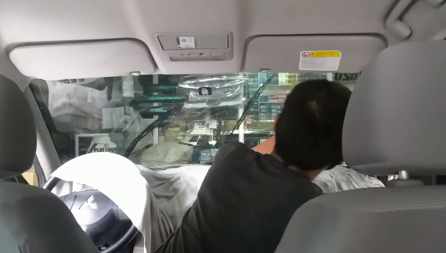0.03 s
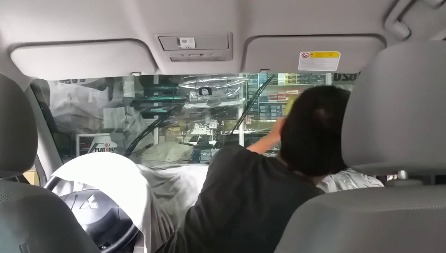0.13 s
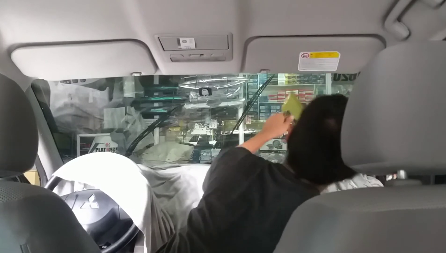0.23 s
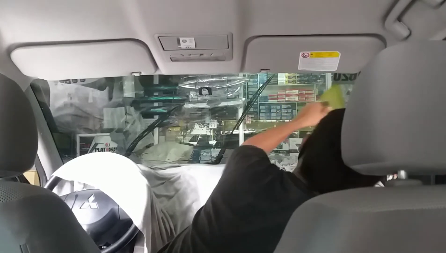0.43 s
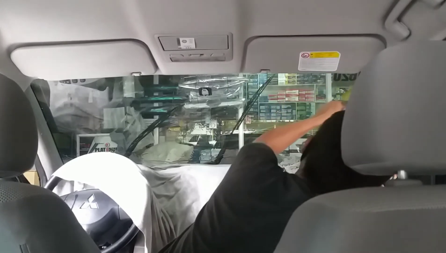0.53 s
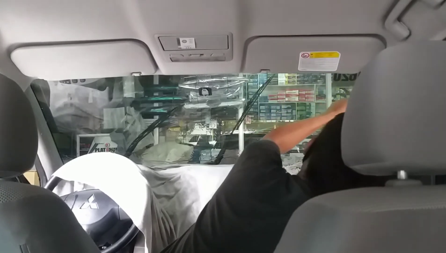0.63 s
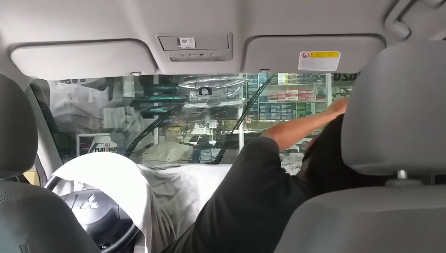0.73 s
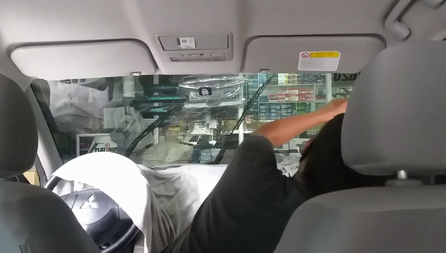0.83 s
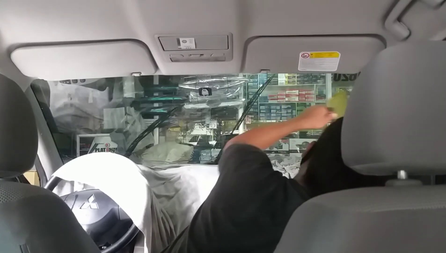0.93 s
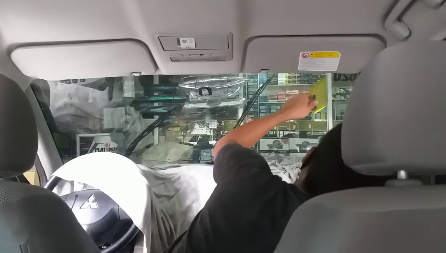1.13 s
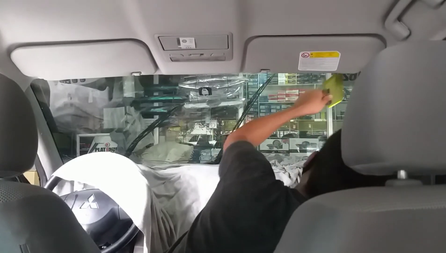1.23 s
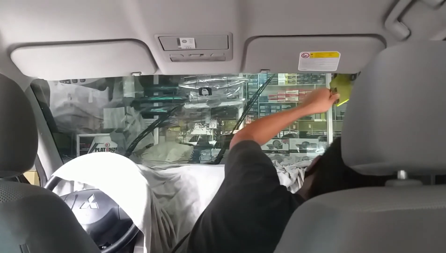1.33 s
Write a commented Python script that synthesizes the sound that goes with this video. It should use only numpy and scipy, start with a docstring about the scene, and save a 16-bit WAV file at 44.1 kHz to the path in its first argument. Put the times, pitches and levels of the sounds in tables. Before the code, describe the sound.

Plastic blade scraping and knocking on a windshield, heard inside the car over a faint motor.

```python
"""A plastic scraper is pushed across a car windshield, heard from the back seat.
From the start, a faint motor outside whines up in pitch over a low workshop hum, while tiny slips of
the blade hiss on the glass. A knock at 0.2 s makes the pane and the small cabin ring briefly.
Near 0.5 s the edge bites harder, squeaks and snaps free, and a lighter knock follows.
The hiss dies away, a last knock comes just after 1 s, and the motor and hum carry on."""
import sys
import numpy as np
from scipy import signal
from scipy.fft import rfft, irfft, next_fast_len
from scipy.io import wavfile
from scipy.ndimage import map_coordinates

SR = 44100
rng = np.random.default_rng(int(sys.argv[2]) if len(sys.argv) > 2 else 0)


def int16_out(signal):
    """Quantize to a 16-bit WAV file."""
    q = np.round(np.clip(np.atleast_2d(signal).T, -1, 1) * 32767)
    wavfile.write(sys.argv[1], SR, q.astype(np.int16))


N = 61739

# The three knocks: start_s, touch_db (relative to the thud), click_db, rebound_db (relative to the
# click), thud_db, ring_db, ring_tilt_db_per_octave, boom_db, click_cutoff_hz
KNOCKS = [(0.2136, -4, -22.5, -1, -27.5, -30.5, 0, -33.5, 10100),
          (0.6123, -44, -31.5, -4.5, -37.5, -59.5, 10.5, -62, 4520),
          (1.0576, -7.5, -26.5, 1, -39, -28, -3.5, -40.5, 12400)]
KNOCK_RISE_S = 0.00089


def scraper():
    """The blade hisses as it glides; where its edge bites, tiny slips make the plastic ring."""
    # How hard the blade presses as it glides: time_s, level_db
    pressure = [(0, -49.5), (.09, -49.5), (.15, -48.5), (.22, -47.5), (.33, -47.5), (.39, -50), (.5, -57),
                (.57, -54), (.61, -66.5), (.68, -67.5)]
    # Tone of the glide: pitch_hz, level_db
    glide_colour = [(60, 7.5), (140, 4), (220, 0.5), (550, 2), (850, -1), (1250, -20), (1700, -4.5),
                    (2800, -8.5), (3700, -2), (5000, -2.5), (7000, -7.5), (9000, -11), (11000, -25),
                    (15500, -45)]
    # How hard the edge bites: time_s, level_db
    bite_levels = [(.2, -60), (.3, -51.5), (.41, -54.5), (.465, -47), (.495, -40.5), (.52, -49),
                   (.553, -40.5), (.563, -38), (.574, -48), (.6, -80), (.63, -83)]
    # Where the blade likes to ring: pitch_hz, width_hz, level_db
    blade_modes = [(550, 26, -3), (993, 170, -4), (1406, 355, -4), (2050, 560, -6.5), (3277, 190, 1),
                   (3645, 50, 4), (4085, 210, 0.5), (4640, 550, -7), (5710, 370, -2), (6780, 390, -4.5),
                   (7780, 680, -12.5), (12800, 1900, -25)]
    # The finest hiss, loudest where the stroke is fast: time_s, level_db
    sizzle_levels = [(0, -77), (.13, -65.5), (.225, -49), (.3, -53.5), (.42, -65), (.56, -73), (.6, -67),
                     (.7, -100)]
    # Tone of that hiss: pitch_hz, level_db
    sizzle_colour = [(3000, -24), (7500, 8), (10700, -1.5), (13000, 5.5), (15500, -7)]
    blade = lambda f: sum((-1) ** k * amp(db) * resonance(f, hz, width)
                          for k, (hz, width, db) in enumerate(blade_modes))
    glide = gains(pressure)[0] * coloured(slips(), glide_colour)
    bite = gains(bite_levels)[0] * unit(filtered(slips(), blade))
    return glide + bite + gains(sizzle_levels)[0] * noise(sizzle_colour)


def slips(per_s=3500, spread_db=1, flutter_db=1.1):
    """The blade moves over the glass in many tiny slips of uneven size."""
    happens = rng.random(N) < per_s / SR
    size = amp(spread_db * rng.standard_normal(N) + flutter_db * wobble(90.14))
    return happens * size * rng.choice([-1, 1], N)


def knocks(click_fade_s=0.014, thud_fade_s=0.094, touch_lead_s=0.01304, rebound_s=0.0039, boom_hz=73.7):
    """The blade touches, hits, then slaps down flat; the pane rings and the cabin air booms."""
    # Tone of the sharp click: pitch_hz, level_db
    click_colour = [(200, -1), (750, 7), (1020, 7.5), (1250, -9.5), (1800, -0.5), (2150, 2), (2650, 1.5),
                    (2950, -9.5), (3300, 2), (4200, -3.5), (5400, -9.5), (8000, -13.5), (15000, -25.5)]
    # Tone of the dull thud: pitch_hz, level_db
    thud_colour = [(100, -9), (250, -7.5), (310, -19.5), (375, 3), (480, 0), (620, -14.5), (760, -1.5),
                   (1000, -14.5), (1250, -18), (2500, -34), (9000, -120)]
    # Notes of the pane in its frame: pitch_hz, level_db, fade_s
    pane = [(151.2, -8.5, 0.19), (195.1, 2.5, 0.16), (257.3, -3.5, 0.2), (368.3, 6, 0.081),
            (461.6, 0.5, 0.11), (513.4, -3.5, 0.16), (563, -12, 0.18), (693, -6, 0.062), (768, -23, 0.14),
            (890, -26, 0.17)]
    contact, ringing, t = np.zeros(N), np.zeros(N), np.arange(N) / SR
    for start, touch_db, click_db, rebound_db, thud_db, ring_db, tilt_db, boom_db, cut_hz in KNOCKS:
        click = filtered(noise(click_colour), lambda hz: 1 / np.sqrt(1 + (hz / cut_hz) ** 6))
        rebound = amp(rebound_db) * strike(start + rebound_s, 0.00014, click_fade_s)
        contact += amp(click_db) * click * (strike(start, 0.00017, click_fade_s) + rebound)
        touch = amp(touch_db) * strike(start - touch_lead_s, KNOCK_RISE_S, thud_fade_s)
        blow = strike(start, KNOCK_RISE_S, thud_fade_s)
        contact += amp(thud_db) * noise(thud_colour) * (touch + blow)
        for hz, db, fade_s in pane:
            level_db = ring_db + db + tilt_db * np.log2(hz / pane[0][0]) + rng.normal(0, 1)
            ringing += ring([(hz, level_db, fade_s)], start, rise_s=2.6 / hz)
        boom = np.sin(2 * np.pi * boom_hz * (t - start))  # the lowest note of the cabin air
        ringing += amp(boom_db) * strike(start, KNOCK_RISE_S, fade_s=0.21) * boom
    return contact, ringing


def blade_rings(snap_db=-31.5):
    """The plastic pings at every knock and rings as it snaps free at the end of the stroke."""
    # Notes of a ping: pitch_hz, level_db (relative to the click), fade_s
    ping_notes = [(1460, -18.5, 0.1), (2106, -13, 0.042), (3290, -22, .06), (4056, -14, .06)]
    # Notes of the snap: pitch_hz, level_db, fade_s
    snap_notes = [(530, -10.5, 0.19), (985, 3, 0.042), (1297, -6, 0.037), (3680, -6.5, 0.049)]
    pings = sum(amp(click_db) * ring(ping_notes, start, KNOCK_RISE_S)
                for start, _, click_db, *_ in KNOCKS)
    return pings + amp(snap_db) * ring(snap_notes, start_s=0.559, rise_s=0.0037)


def stick_slip():
    """The edge catches and lets go on the glass: two thin squeaks and a low judder."""
    # Loudness of the squeaks: time_s, low_tone_db, high_tone_db
    squeak_levels = [(0, -61, -56.5), (.2, -75, -57), (.29, -52, -75), (.45, -60.5, -95), (.51, -72, -52.5),
                     (.555, -65, -46), (.58, -58, -44.5), (.605, -75, -66), (.65, -86, -103)]
    # Their pitches: low_hz, high_hz
    squeak_pitches = [974, 3706]
    # The dragged blade shakes the pane: time_s, level_db
    judder_levels = [(0, -53), (.06, -49.5), (.17, -61), (.28, -44), (.38, -53), (.43, -62), (.6, -85)]
    squeak = sum(gain * tone(hz, jitter=0.025, per_s=350)
                 for gain, hz in zip(gains(squeak_levels), squeak_pitches))
    return squeak + gains(judder_levels)[0] * tone(hz=143, jitter=0.053, per_s=60)


def hand_bumps():
    """The hand nudges the pane as it changes its grip and pressure."""
    # The nudges: start_s, level_db
    bumps = [(.16, -54.5), (.57, -45.5), (0.639, -43), (.77, -56), (1.007, -49), (1.125, -48.5)]
    # Their dull tone: pitch_hz, level_db
    colour = [(60, -11), (170, -0.5), (330, 3), (520, -7.5), (750, -14), (1500, -46), (6000, -120)]
    return noise(colour) * sum(amp(db) * strike(start, rise_s=0.0031, fade_s=0.15) for start, db in bumps)


def cabin_echo(x):
    """The padded inside of the car gives a short echo whose treble dies first."""
    # How long the echo lasts: pitch_hz, fade_s
    fades = [(100, 0.24), (500, 0.28), (2000, 0.2), (10000, 0.054)]
    hz, t, spectrum = signal.stft(rng.standard_normal(SR // 2), SR, nperseg=256)
    tail = signal.istft(spectrum * amp(-60 * t / along(fades, hz)[:, None]), SR, nperseg=256)[1]
    delayed = np.pad(tail, (SR // 250, 0))  # 4 ms late
    return signal.fftconvolve(x, delayed / np.linalg.norm(tail))[:N]


def motor(top_hz=2411, climb_hz=397.2, spin_up_s=0.55, jitter_hz=14.46, flutter_db=2.5):
    """A far motor speeds up: two unsteady tones an octave apart, over rushing air."""
    # Loudness of the whine: time_s, low_tone_db, high_tone_db
    whine_levels = [(0, -102, -81.5), (.26, -63, -58), (.38, -55, -81), (.6, -60.5, -86), (.71, -62, -77),
                    (.745, -53.5, -73), (.8, -51.5, -77), (.85, -72, -60), (.915, -54.5, -66.5),
                    (1, -60, -58), (1.12, -63, -64), (1.2, -67.5, -69), (1.3, -69.5, -62),
                    (1.4, -66, -60.5)]
    # Loudness of the air: time_s, level_db
    air_levels = [(0, -64), (.65, -56), (.8, -56), (.92, -58.5), (1.1, -56.5), (1.25, -60), (1.4, -61.5)]
    # Tone of the air: pitch_hz, level_db
    air_colour = [(300, -2.5), (950, -6), (1300, 3), (2100, 6), (2900, -3.5), (3500, -1), (4200, 2.5),
                  (5000, 0), (6000, -8.5), (7200, -12.5), (8500, -25), (10500, -22.5), (15500, -30)]
    hz = top_hz - climb_hz * np.exp(-np.arange(N) / SR / spin_up_s) + jitter_hz * wobble(160)
    phase = 2 * np.pi * np.cumsum(hz) / SR
    whine = sum(gain * unit(np.sin(k * phase) * amp(flutter_db * wobble(130)))
                for k, gain in enumerate(gains(whine_levels), 1))
    return whine + gains(air_levels)[0] * noise(air_colour)


def workshop_hum(level_db=-58.5):
    """Low workshop noise comes through the body of the car."""
    # Tone of the hum: pitch_hz, level_db
    colour = [(20, -22), (40, 2), (62, 1.5), (100, -6.5), (155, -5.5), (220, -13.5), (300, -8),
              (400, -26.5), (540, -12.5), (800, -27), (2000, -73), (8000, -120)]
    return amp(level_db) * noise(colour)


def microphones(mid, reach_widths=1.8):
    """Two close microphone openings hear the same, except where they ring and in the top treble."""
    # Where the openings ring: pitch_hz, width_hz, level_db, sign (1 = left louder)
    ports = [(1910, 455, -10.5, -1), (9700, 310, -4, 1)]
    # Treble that spreads left and right: pitch_hz, side_db
    sparkle = [(5000, -67), (7000, -61), (8500, -40), (11000, -29), (12500, -49), (15000, -34)]
    near = lambda f, hz, width: np.exp(-((f - hz) / (reach_widths * width)) ** 2)
    port_ring = lambda f: sum(sign * amp(db) * resonance(f, hz, width) * near(f, hz, width)
                              for hz, width, db, sign in ports)
    side = filtered(mid, lambda f: port_ring(f) + 1j * amp(along(sparkle, f)))
    return np.array([mid + side, mid - side])


def amp(db):
    """Turn decibels into a gain to multiply by."""
    return 10 ** (np.asarray(db) / 20)


def unit(x):
    """Scale to an average strength (rms) of 1."""
    return x / np.sqrt(np.mean(x ** 2) + 1e-20)


def along(points, hz):
    """Read between (pitch_hz, value) points, spacing octaves evenly."""
    pitches, values = np.transpose(points)
    return np.interp(np.log(hz + 1), np.log(pitches + 1), values)


def gains(rows):
    """One gain curve for each decibel column after the time."""
    times, *columns = np.transpose(rows)
    return [amp(np.interp(np.arange(N) / SR, times, db)) for db in columns]


def wobble(per_s):
    """A smooth curve through per_s random values a second."""
    return map_coordinates(rng.standard_normal(4096), [np.arange(N) * per_s / SR], mode="wrap")


def filtered(x, response):
    """Multiply each frequency in x by response(hz)."""
    size = next_fast_len(N + SR // 2)
    return irfft(rfft(x, size) * response(np.fft.rfftfreq(size, 1 / SR)), size)[..., :N]


def coloured(x, colour):
    """Give x a colour (a balance of low and high pitches), at strength 1."""
    return unit(filtered(x, lambda hz: amp(along(colour, hz))))


def noise(colour):
    """Noise of the given colour, at strength 1."""
    return coloured(rng.standard_normal(N), colour)


def resonance(f, hz, width):
    """A filter response that favours frequencies f close to hz."""
    return 1j * f * width / (hz * hz - f * f + 1j * f * width)


def strike(start_s, rise_s, fade_s):
    """Loudness of a blow: a quick rise, then a fall of 60 dB every fade_s."""
    age = np.maximum(np.arange(N) / SR - start_s, 0)
    return (1 - np.exp(-age / rise_s)) * amp(-60 * age / fade_s)


def ring(notes, start_s, rise_s):
    """Fading notes set off at one moment."""
    t = np.arange(N) / SR
    return sum(amp(db) * strike(start_s, rise_s, fade_s) * np.sin(2 * np.pi * (hz * t + rng.random()))
               for hz, db, fade_s in notes)


def tone(hz, jitter, per_s, flutter_db=5.8):
    """A tone that wavers in pitch and loudness, at strength 1."""
    phase = 2 * np.pi * np.cumsum(hz * (1 + jitter * wobble(per_s))) / SR
    return unit(np.sin(phase) * amp(flutter_db * wobble(per_s / 3)))


def scene(knock_echo_db=-11.5, scrape_echo_db=-9.5):
    """Scraping and knocks echo in the cabin, over the motor and the hum."""
    contact, ringing = knocks()
    scrape = scraper()
    echo = cabin_echo(amp(knock_echo_db) * contact + amp(scrape_echo_db) * scrape)
    windshield = scrape + stick_slip() + blade_rings() + hand_bumps() + contact + ringing
    return microphones(windshield + echo + motor() + workshop_hum())


def record(dry, low_cut_hz=49, top_hz=15800):
    """Soften the deepest bass and remove the very highest treble."""
    low_cut = lambda ratio: -ratio ** 2 / (1 - ratio ** 2 + 1j * np.sqrt(2) * ratio)
    return filtered(dry, lambda hz: low_cut(hz / low_cut_hz) * (hz < top_hz))


dry = scene()
out = record(dry)
int16_out(out)
```